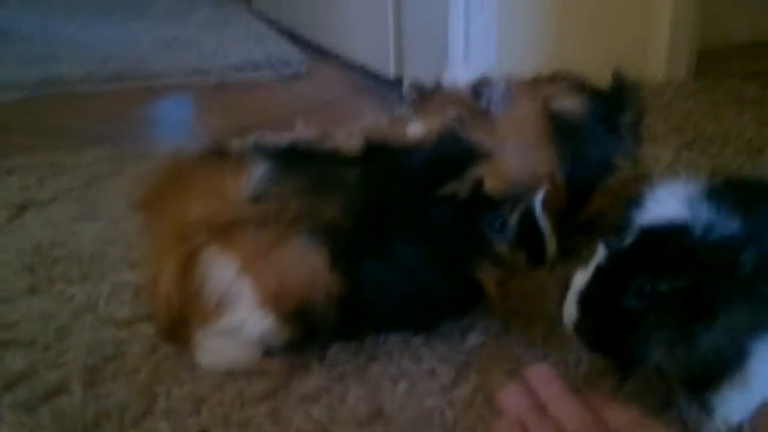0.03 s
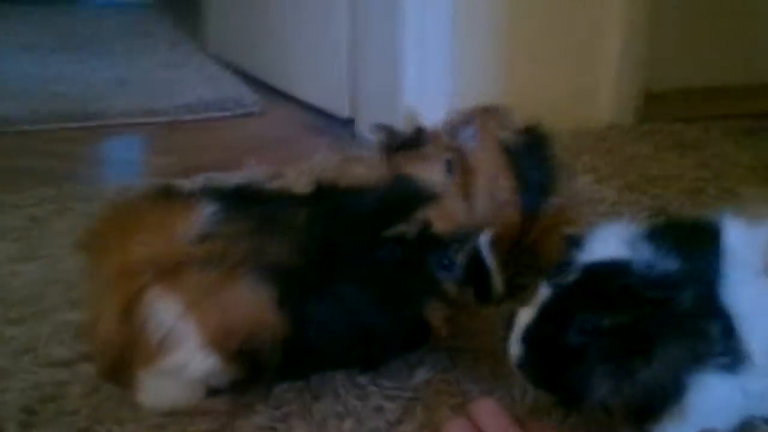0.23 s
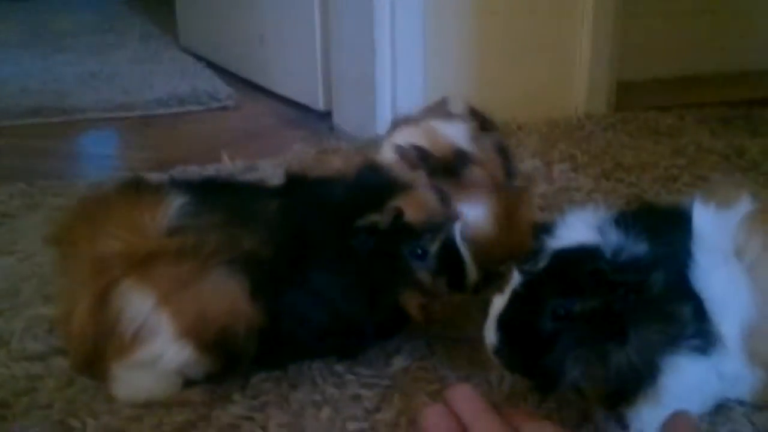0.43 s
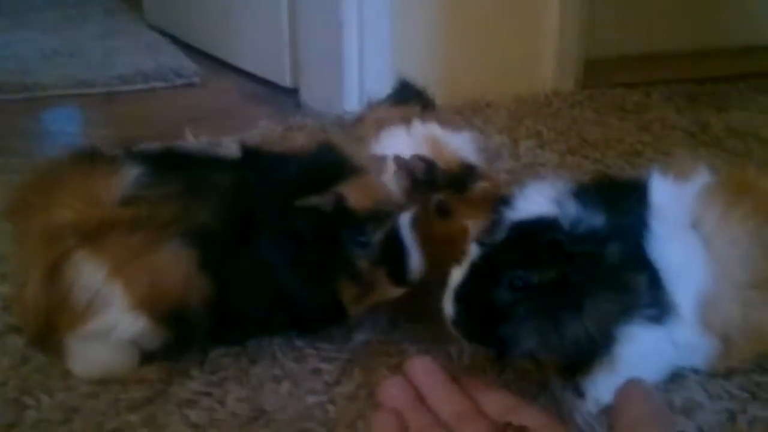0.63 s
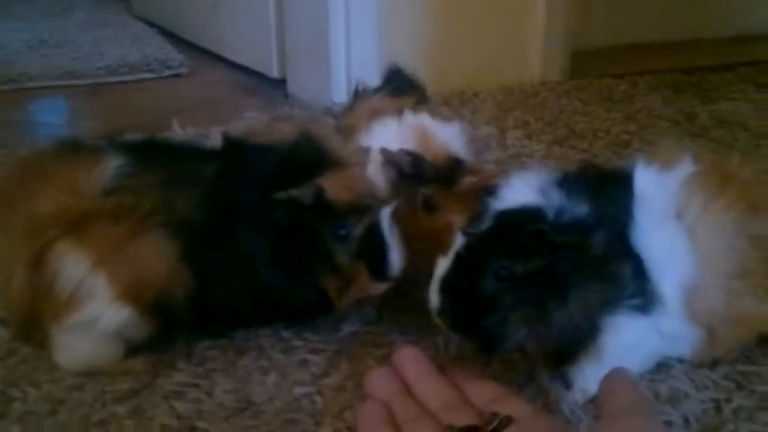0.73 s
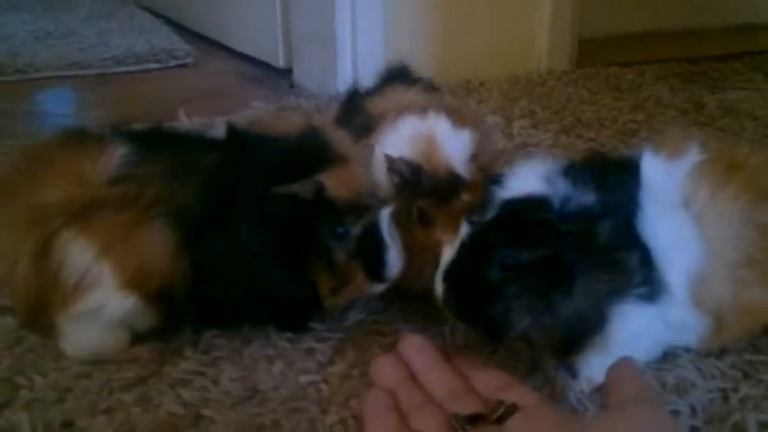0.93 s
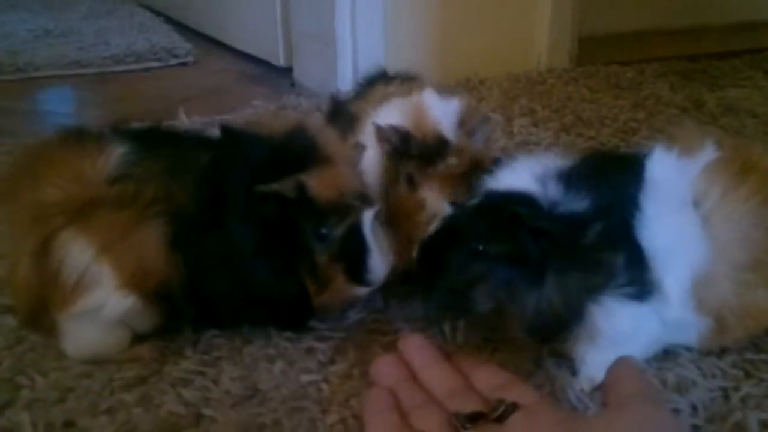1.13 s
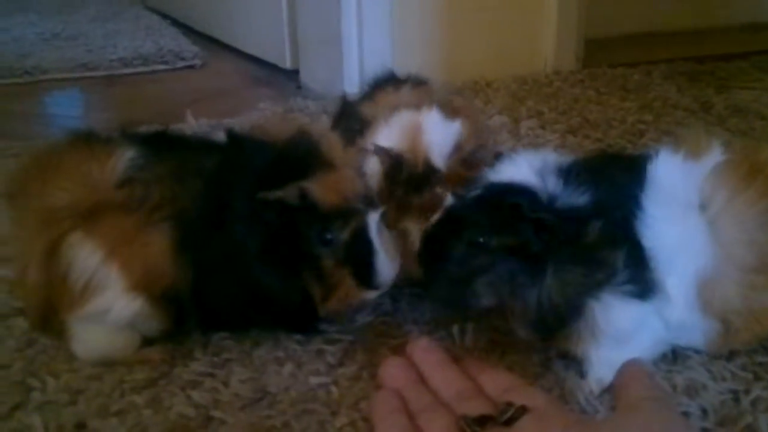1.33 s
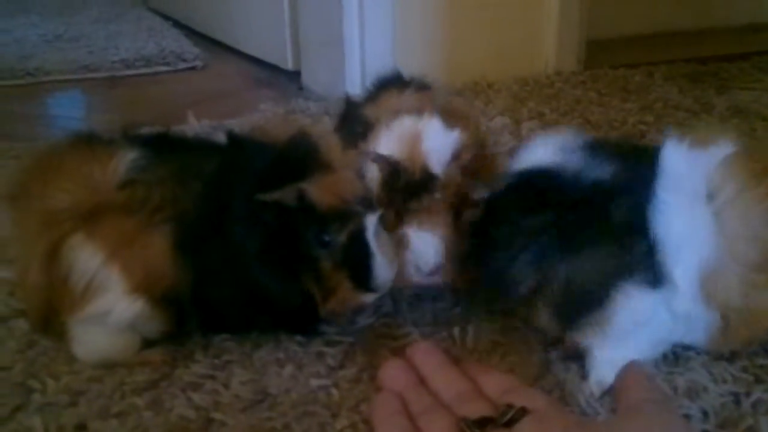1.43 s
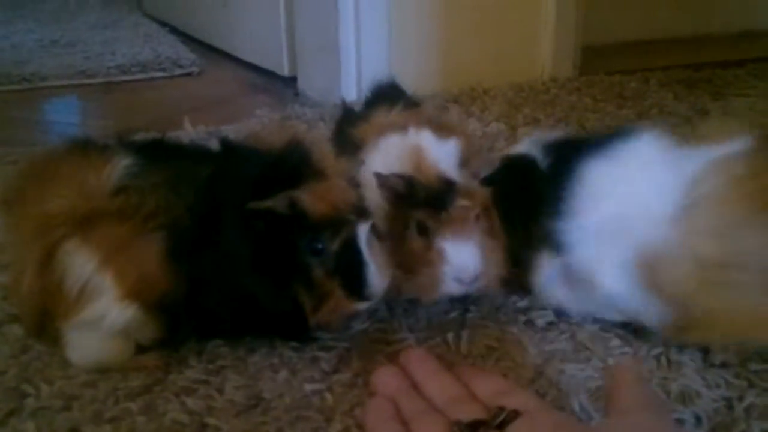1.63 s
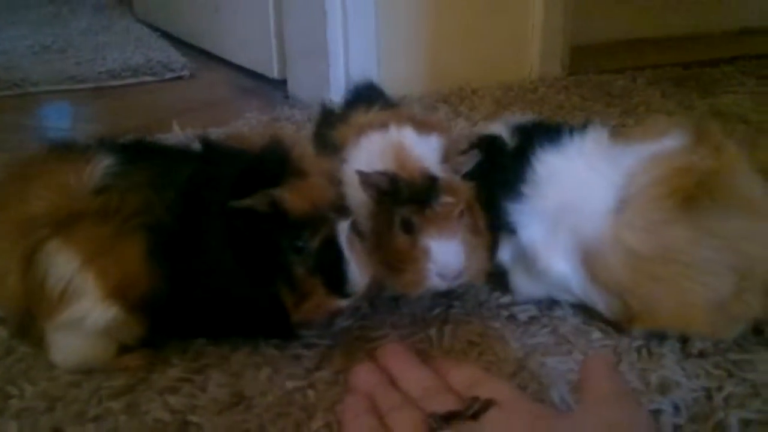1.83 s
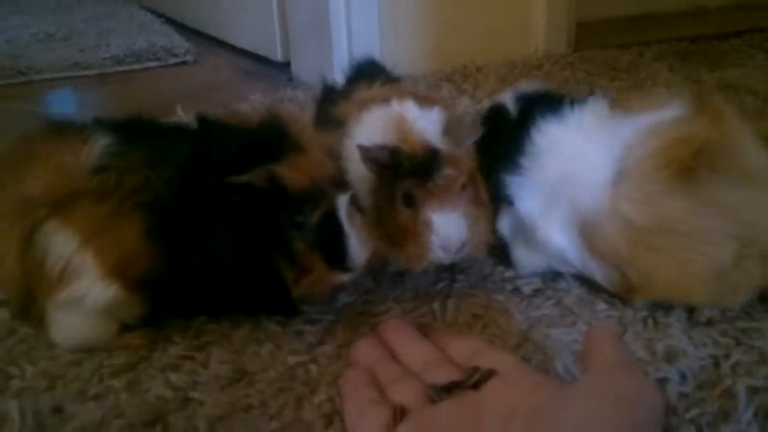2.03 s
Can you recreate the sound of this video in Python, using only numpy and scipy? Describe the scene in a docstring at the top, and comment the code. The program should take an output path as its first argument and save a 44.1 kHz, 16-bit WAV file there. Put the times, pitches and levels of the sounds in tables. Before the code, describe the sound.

Rapid, squeaky guinea pig clucking over dull thumps and handling rumble in a quiet room.

```python
"""Guinea pigs cluck about ten times a second, crowding round a hand on a carpet in a quiet room.
Each cluck is a short voiced note, shaped by the throat, that scoops down in pitch and flicks up again;
some are hoarse or break into creaky growls of uneven pulses. Soft bumps boom near the microphone,
a low hum comes and goes, and fur and carpet rustle over handling rumble and faint hiss."""
import sys
import numpy as np
from scipy import signal
from scipy.fft import rfft, irfft
from scipy.io import wavfile
from scipy.ndimage import uniform_filter1d

SR = 44100
rng = np.random.default_rng(int(sys.argv[2]) if len(sys.argv) > 2 else 0)


def file_out(sig):
    """Save sig as 16-bit WAV at sys.argv[1]."""
    # one column per channel
    cols = np.atleast_2d(sig).T
    # limit, then scale
    lim = np.clip(cols, -1, 1)
    pcm = np.round(lim * 32767).astype(np.int16)
    wavfile.write(sys.argv[1], SR, pcm)


N = 92610
T = np.arange(N) / SR
BINS_HZ = np.maximum(np.arange(N // 2 + 1) * SR / N, 1)

# throat response: f/Hz, gain/dB
THROAT = [(250, -2.5), (640, -2.5), (1100, -7.5), (1400, -32.5), (2150, -25.5), (2550, -17.5),
          (3000, -28.5), (3600, -30.5), (4200, -37), (5000, -57), (9000, -75)]
# harsh edge of a pressed voice: f/Hz, gain/dB
EDGE = [(900, -25), (1400, -5), (2600, 0.5), (3100, -6.5), (4100, -9.5), (5000, -35)]
# hiss of air and fur: f/Hz, gain/dB
HISS = [(200, 1), (800, 0), (1400, -13.5), (4500, -20.5), (10000, -31.5), (15000, -42)]


def clucks():
    """Harmonics of a scooping pitch through the throat; hoarseness adds jitter, half harmonics, rasp."""
    # t/s, length/s, start f/Hz, turn f/Hz, end f/Hz, turn/share of length, level/dB, tilt/dB, roughness/0-1
    notes = [ (0.042, 0.067, 900, 685, 1097, 0.56, -39, -4, 0.2),
             (0.152, 0.052, 900, 680, 720, .7, -39.5, -3, 0.5),
             (.255, .043, 700, 739, 980, .1, -50, 14, .12),
             (0.353, 0.067, 904, 618.7, 1174, 0.53, -40, -2, 0.35),
             (0.461, 0.037, 815, 813, 1140, 0.16, -41.5, -10, 0.25),
             (.547, .071, 885, 865, 1050, .42, -40, 1, .2),
             (0.656, 0.068, 945, 666.7, 1350, .48, -39, -2.5, 0.18),
             (0.761, 0.048, 810, 977, 960, 0.93, -38, -4.5, 0.2),
             (.798, .056, 850, 785, 1550, .68, -37, 3, .2),
             (0.913, 0.021, 803, 782, 1100, 0.21, -38, -15, 0.3),
             (.979, .066, 900, 625, 1060, .48, -39, -7, .28),
             (1.082, .059, 900, 660, 1400, .6, -40, -2.5, .5),
             (1.183, .062, 937, 673.6, 1100, 0.5, -46.5, 1, 0.65),
             (1.294, 0.068, 897, 613, 1250, 0.8, -38.5, -4.5, 0.25),
             (1.407, 0.06, 720, 847, 740, 0.4, -36, -6.5, 0.25),
             (1.512, .017, 540, 1130, 1090, .85, -37.5, 17, .18),
             (1.574, .05, 995, 700, 740, 0.6, -41, -3, 0.6), (1.612, .058, 700, 810, 560, .5, -36, -3, .42)]
    even_db, flick_db_per_octave, top_hz = -10, 8.5, 4975
    out = np.zeros(N)
    jitter, shimmer, waver, flutter = drift(110), drift(210), drift(45), drift(54)
    throat_rasp, edge_rasp = noise(THROAT), noise(EDGE)
    orders = np.arange(1, 19)[:, None] / 2
    for start_s, length_s, start_hz, turn_hz, end_hz, turn, db, tilt_db, rough in notes:
        span = (T >= start_s) & (T < start_s + length_s)
        t = T[span] - start_s
        u = t / length_s
        fall_hz = (start_hz - turn_hz) * np.maximum(1 - u / turn, 0) ** 1.7
        flick_hz = (end_hz - turn_hz) * np.maximum((u - turn) / (1 - turn), 0) ** 2.6
        hz = turn_hz + fall_hz + flick_hz
        wobble = 1 + .018 * waver[span] + .06 * rough * jitter[span]
        phase = 2 * np.pi * np.cumsum(hz * wobble) / SR
        ends = (2 * u - 1) ** 2   # both ends are brighter and quieter
        press_db = tilt_db + 2.5 * ends + flick_db_per_octave * np.log2(1 + flick_hz / turn_hz)
        tilt = from_db(press_db * np.clip(np.log(orders * hz / 900), 0, 1.4))
        source = np.where(orders % 1, .6 * rough, np.where(orders % 2, 1, from_db(even_db)))
        partials = gain_at(THROAT, orders * hz) * tilt * source * (orders * hz < top_hz)
        partials *= from_db(4.5 * (orders > 1) * (flicker(len(orders), len(t)) - .5))
        voice = np.sqrt(hz / 375) * np.sum(partials * np.sin(orders * phase), axis=0)
        voice *= 1 + .7 * rough * shimmer[span]
        rasp = .45 * throat_rasp[span] + from_db(press_db - 17) * edge_rasp[span]
        rasp *= rough * (1 + np.cos(phase))
        level = from_db(db - 9 * ends + 1.2 * flutter[span])
        out[span] += level * gate(t, length_s, attack_s=.0071, release_s=.0016) * (voice + rasp)
    return out


def growls():
    """Uneven pulses and rasp ring the throat; the harsh edge grows with the swell."""
    # t/s, length/s, start f/Hz, end f/Hz, end level/dB, swell/dB, roughness/0-1
    creaks = [ (.162, .05, 307, 474.7, -46, 5, 0.69), (.896, 0.039, 333.9, 472, -49, 2, 0.28),
              (1.464, .056, 177.4, 438, -40, 9.5, 0.19), (1.591, 0.026, 327.4, 351.5, -41.5, 4, .3)]
    edge_db = -13
    plain, pressed, jitter = np.zeros(N), np.zeros(N), drift(200)
    shimmer, rasp = rng.standard_normal((2, N))
    for start_s, length_s, start_hz, end_hz, db, swell_db, rough in creaks:
        span = (T >= start_s) & (T < start_s + length_s)
        u = (T[span] - start_s) / length_s
        hz = start_hz * (end_hz / start_hz) ** u * np.exp(.2 * rough * jitter[span])
        cycles = np.cumsum(hz) / SR
        pulses = (np.diff(np.floor(cycles), prepend=-1) > 0) * from_db(5 * rough * shimmer[span])
        pulsed_rasp = .9 * rough * rasp[span] * (1 + np.cos(2 * np.pi * cycles))
        source = rms_one(rms_one(pulses) + pulsed_rasp)
        swell = from_db(swell_db * (u - 1))
        plain[span] += from_db(db) * source * swell
        pressed[span] += from_db(db + edge_db) * source * swell ** 2
    return coloured(plain, THROAT) + coloured(pressed, EDGE)


def grunts():
    """Soft, nearly pure low notes under the clucks."""
    # t/s, length/s, f/Hz, level/dB
    notes = [(0.905, .05, 266, -42), (1.066, 0.057, 309.7, -47.5), (1.402, 0.069, 323, -44.5)]
    out = np.zeros(N)
    for start_s, length_s, hz, db in notes:
        triangle = 2 * gate(T - start_s, length_s, length_s / 2, length_s / 2)
        out += from_db(db) * triangle * np.sin(2 * np.pi * hz * T)
    return out


def bumps():
    """Each soft bump swells into a short boom, with rubbing, slightly to the right."""
    # peak t/s, f/Hz, peak level/dB, swell/s, decay/s
    hits = [(.014, 60.4, -24, 0.022, 0.01), (.222, 80.6, -8.5, 0.015, 0.017),
            (0.337, 76.1, -26, 0.095, 0.029), (.447, 84.3, -25, 0.021, 0.015),
            (1.08, 79.5, -30, 0.017, 0.0046), (1.152, 78.5, -22.5, 0.032, 0.014),
            (1.294, 64.6, -20.5, 0.0085, 0.0083), (1.329, 81.3, -18, 0.019, 0.02),
            (1.366, 75.7, -19, 0.01, 0.022), (1.528, 96.4, -21.5, 0.032, 0.015),
            (1.749, 83.66, -12.5, 0.025, 0.035), (1.813, 58.4, -21.5, 0.02, 0.022)]
    # rubbing under a bump: f/Hz, gain/dB
    rub = [(120, 7), (230, -5.5), (1500, -38), (6000, -78)]
    rub_db = -19.5
    boom, force = np.zeros(N), np.zeros(N)
    for peak_s, hz, db, swell_s, decay_s in hits:
        t = T - peak_s
        rise = np.exp(-(t / swell_s) ** 2)
        fall = np.exp(.5 - np.hypot(t / decay_s, .5))
        level = from_db(db) * np.where(t < 0, rise, fall)
        boom += level * np.cos(2 * np.pi * hz * t)
        force += level
    return pan_right(boom + from_db(rub_db) * force * noise(rub), db=1.8)


def crackles():
    """The two hardest bumps crackle."""
    # t/s, half length/s, level/dB
    bursts = [ (.218, .006, -60), (1.749, .011, -59)]
    # f/Hz, gain/dB
    spectrum = [(1000, 15.5), (3000, 6.5), (6000, 5.5), (15000, -14.5)]
    return swells(bursts) * wide_noise(spectrum, spread=.69) * drift(500) ** 2 / 2


def scuffs():
    """Feet brush the carpet."""
    # t/s, half length/s, level/dB
    steps = [(.197, .013, -51), (.415, 0.042, -48), (1.788, .028, -49), (2.073, 0.031, -50)]
    # f/Hz, gain/dB
    spectrum = [(150, -31), (400, 10.5), (750, 12.5), (1500, -10.5), (6000, -44)]
    return swells(steps) * wide_noise(spectrum, spread=.54)


def rustles():
    """Fur brushes fur."""
    # t/s, half length/s, level/dB
    brushes = [(1.06, 0.023, -53.5), (1.275, 0.024, -52)]
    return from_left(swells(brushes) * noise(HISS))


def knock():
    """A small hard contact on the right rings briefly."""
    # f/Hz, level/dB
    modes = [(480, -33), (680, -39.5), (1250, -52.5), (4550, -61)]
    start_s, rise_s, t60_s = 1.7985, .001, .014
    t = np.maximum(T - start_s, 0)
    ring = sum(from_db(db - 60 * t / t60_s) * np.sin(2 * np.pi * hz * t) for hz, db in modes)
    return pan_right(ring * np.minimum(t / rise_s, 1), db=3.5)


def hum():
    """A low, wavering hum comes and goes; harmonics 1, 2 and 4 dominate."""
    # t/s, length/s, level/dB
    spells = [(.178, 0.17, -49.5), (1.269, 0.18, -54.5), (1.682, .17, -47), (1.792, 0.36, -52)]
    # harmonics 1-5: gain/dB
    harmonics_db = [5.5, 5.5, -12.5, 4.5, -12.5]
    pitch_hz = 65.22
    level = sum(from_db(db) * gate(T - start_s, length_s, attack_s=.0032, release_s=.084)
                for start_s, length_s, db in spells)
    phase = 2 * np.pi * np.cumsum(pitch_hz * (1 + .01 * drift(17.1))) / SR
    tone = sum(from_db(db) * np.sin(k * phase + rng.uniform(0, 2 * np.pi))
               for k, db in enumerate(harmonics_db, 1))
    return level * np.sqrt(2) * tone


def rumble():
    """Handling rumble: deep noise that swells and fades."""
    # t/s, level/dB
    contour = [(0, -37.5), (.15, -38.5), (.29, -31), (.86, -50.5), (1.24, -57), (1.45, -45.5), (1.6, -43),
               (1.72, -26), (1.9, -36.5)]
    # f/Hz, gain/dB
    spectrum = [(20, -15), (55, 9), (110, -1), (300, -17), (1200, -71.5)]
    return from_db(np.interp(T, *np.transpose(contour))) * wide_noise(spectrum, spread=1)


def air():
    """Faint hiss that drops slightly after the last loud bump."""
    # t/s, gain/dB
    contour = [(1.75, 1), (1.85, -1.5)]
    level = from_db(-59.5 + np.interp(T, *np.transpose(contour)))
    return level * (from_left(noise(HISS)) + .25 * np.array([noise(HISS), noise(HISS)]))


def room(x):
    """Short diffuse echo, different on each side, dulled by the carpet."""
    t60_s, delay_s, carpet_cut_hz, send_db = .097, .0097, 1500, -7.5
    tail = rng.standard_normal((2, N)) * from_db(-60 * T / t60_s) * (T > delay_s)
    tail /= np.sqrt(np.sum(tail ** 2, axis=1, keepdims=True))
    tail = signal.sosfilt(signal.butter(1, carpet_cut_hz, fs=SR, output="sos"), tail)
    return from_db(send_db) * signal.fftconvolve(x, tail, axes=1)[:, :N]


def from_left(x):
    """Sound from the left reaches the right side later and shaded."""
    # right side relative to left: f/Hz, gain/dB
    shade = [(300, -10.5), (800, -3.5), (2400, -16), (3800, -10), (5500, -8)]
    lag_s = .00009
    response = gain_at(shade, BINS_HZ) * np.exp(-2j * np.pi * BINS_HZ * lag_s)
    return np.array([x, irfft(rfft(x) * response, N)])


def pan_right(x, db):
    """Left down and right up by db."""
    return x * from_db([[-db], [db]])


def from_db(db):
    """Decibels to gain."""
    return 10 ** (np.asarray(db) / 20)


def rms_one(x):
    """Scale to rms 1."""
    return x / np.sqrt(np.mean(x ** 2) + 1e-20)


def gain_at(spectrum, hz):
    """Gain of a spectrum at hz, interpolated in log frequency."""
    points_hz, db = np.transpose(spectrum)
    return from_db(np.interp(np.log(hz), np.log(points_hz), db))


def coloured(x, spectrum):
    """Filter by a spectrum, keeping the power of white noise."""
    return irfft(rfft(x) * rms_one(gain_at(spectrum, BINS_HZ)), N)


def noise(spectrum):
    """Coloured noise, rms 1."""
    return rms_one(coloured(rng.standard_normal(N), spectrum))


def wide_noise(spectrum, spread):
    """Stereo noise: a common part plus one per side, rms 1."""
    return rms_one(noise(spectrum) + spread * np.array([noise(spectrum), noise(spectrum)]))


def drift(rate_hz):
    """Low-passed random wander, rms 1."""
    return rms_one(irfft(rfft(rng.standard_normal(N)) / (1 + (BINS_HZ / rate_hz) ** 2), N))


def flicker(count, samples, smooth_samples=220):
    """Quick independent waver for each partial, rms 1."""
    white = rng.standard_normal((count, samples))
    return rms_one(uniform_filter1d(uniform_filter1d(white, smooth_samples), smooth_samples))


def gate(t, length_s, attack_s, release_s):
    """Linear attack, hold, release."""
    return np.clip(t / attack_s, 0, 1) * np.clip((length_s - t) / release_s, 0, 1)


def swells(rows):
    """Envelope of bell-shaped swells."""
    return sum(from_db(db) * np.exp(-((T - peak_s) / half_s) ** 2) for peak_s, half_s, db in rows)


def scene():
    """Voices on the left with their echo, contact sounds and a low background."""
    voices = from_left(clucks() + growls() + grunts())
    background = rumble() + air()
    echo = room(voices)
    return voices + echo + bumps() + hum() + crackles() + scuffs() + rustles() + knock() + background


def record(dry):
    """Steep low-pass on the top treble."""
    stop_db, stop_hz = 70, 16700
    return signal.sosfilt(signal.cheby2(12, stop_db, stop_hz, fs=SR, output="sos"), dry)


dry = scene()
out = record(dry)
file_out(out)
```